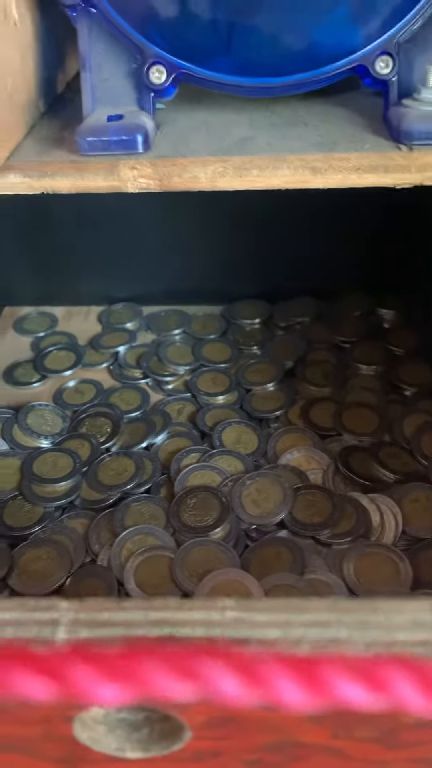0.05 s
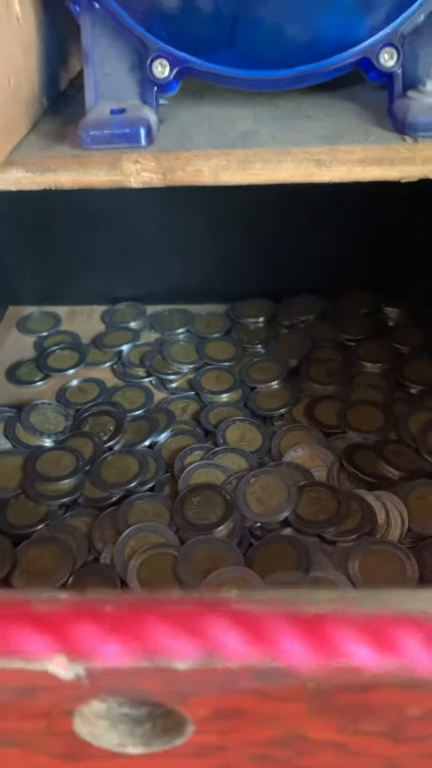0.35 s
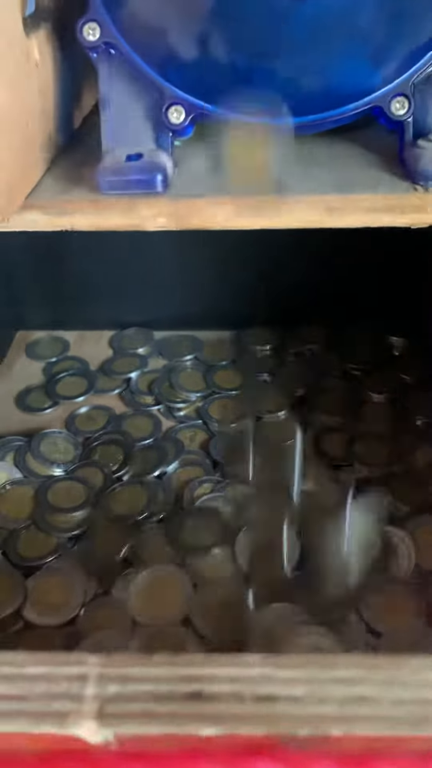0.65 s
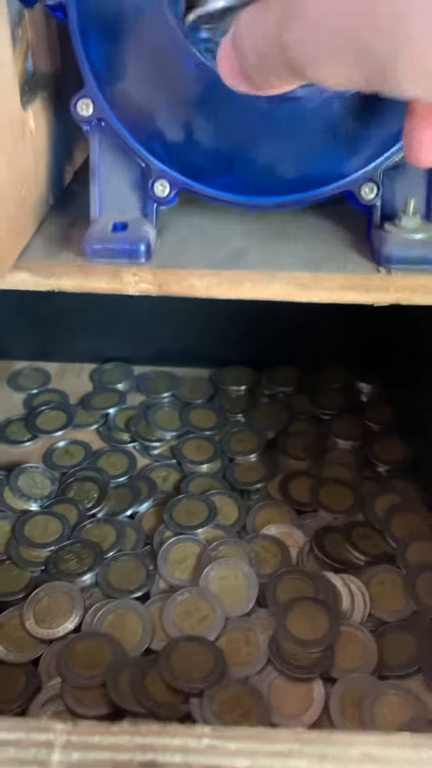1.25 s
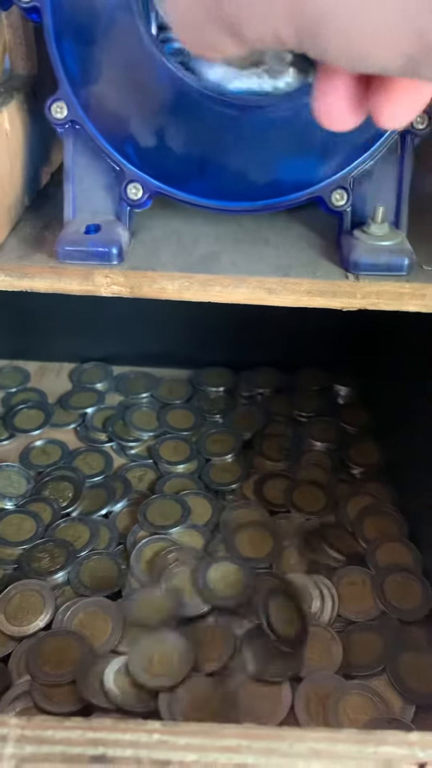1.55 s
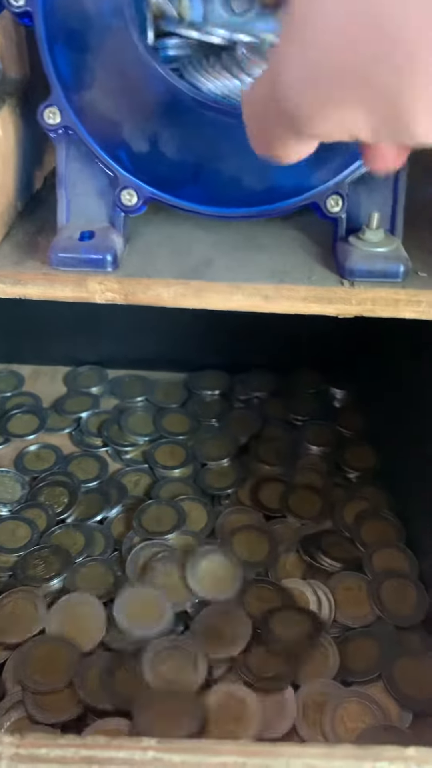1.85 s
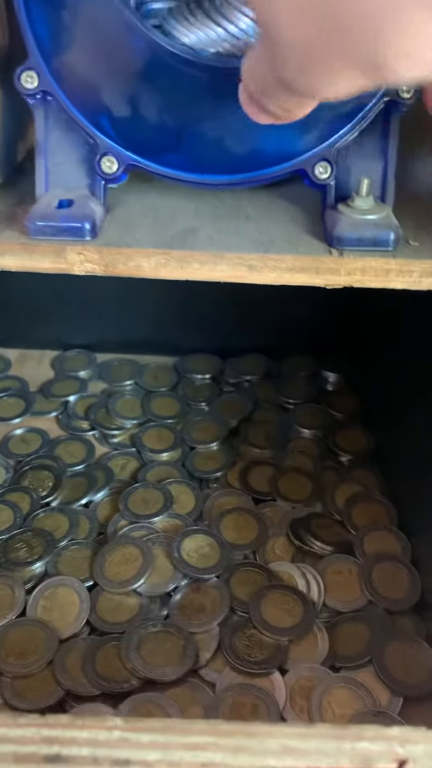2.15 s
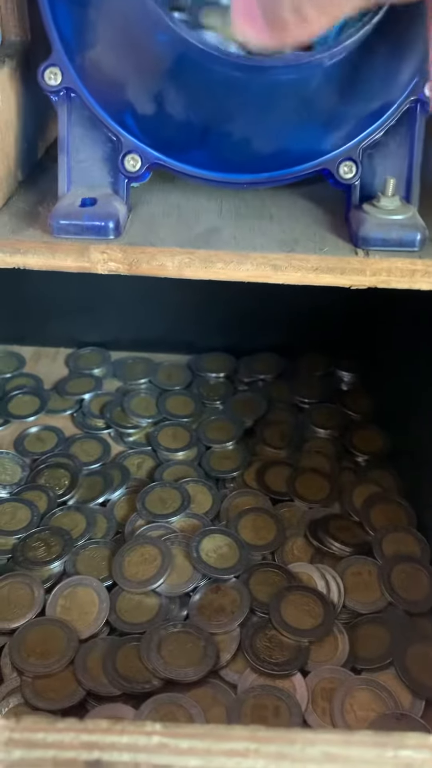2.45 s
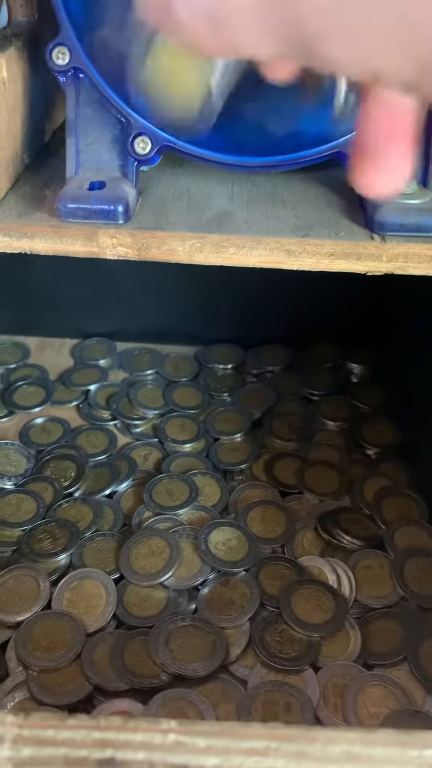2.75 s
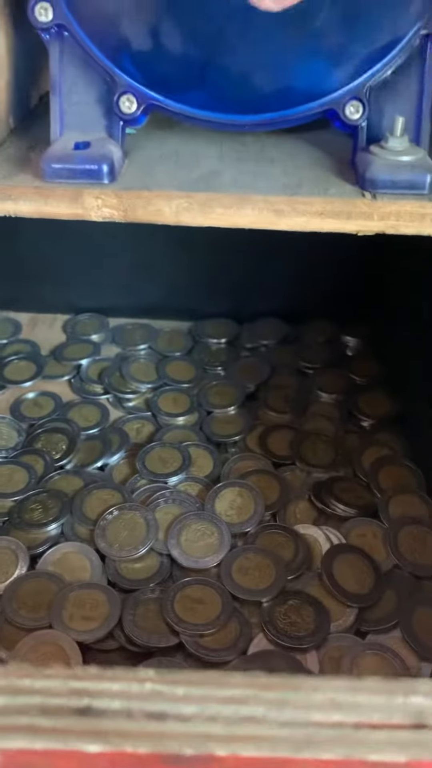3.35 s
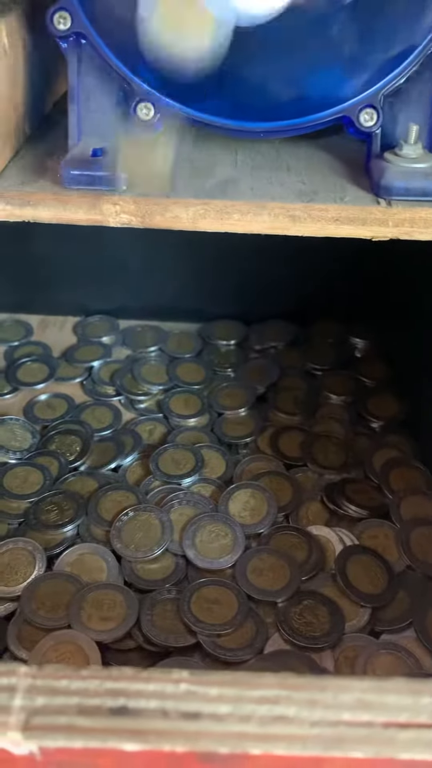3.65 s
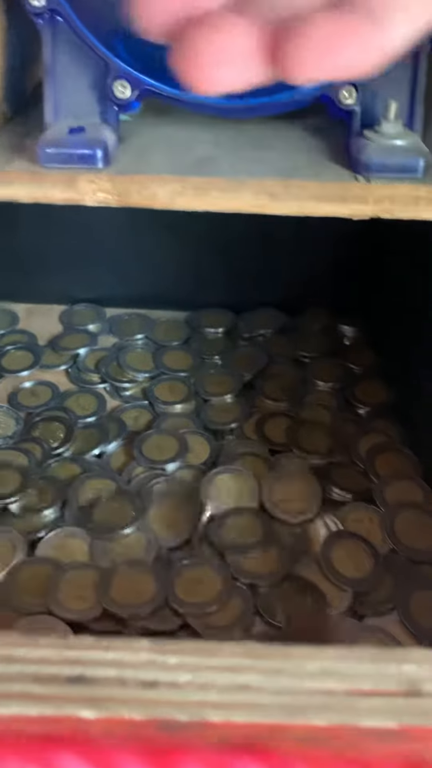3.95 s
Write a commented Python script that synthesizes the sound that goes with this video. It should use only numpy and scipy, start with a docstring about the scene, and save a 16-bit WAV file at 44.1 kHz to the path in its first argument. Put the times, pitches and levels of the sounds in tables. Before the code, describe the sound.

Coins drop onto a heap of coins in five spills, each clinking, thumping the wooden floor and rattling to rest. Between spills, fingers scrape and stir coins in a plastic drum, close by in a wooden cabinet.

```python
"""At a wooden cabinet, a hand pushes coins out of a plastic drum onto a heap of coins, in five spills.
Each landing clinks and thumps the floor board, then the heap rattles and rings as it settles.
A few coins bounce onto bare wood. Between spills, fingers scrape and stir the coins in the drum,
and the hand now and then bumps the cabinet. Cabinet and room echo, and a low hum lies underneath."""
import sys
import numpy as np
from scipy import signal
from scipy.fft import rfft, irfft
from scipy.io import wavfile
from scipy.ndimage import uniform_filter1d

SR = 44100
rng = np.random.default_rng(int(sys.argv[2]) if len(sys.argv) > 2 else 0)


def wrap_up_sound(samples):
    """Save the sound to the file named by the first command line argument, as 16-bit audio."""
    columns = np.atleast_2d(samples).T
    # keep every value between -1 and 1, then stretch to whole-number steps
    tamed = np.clip(columns, -1, 1)
    steps = np.round(tamed * 32767).astype(np.int16)
    wavfile.write(sys.argv[1], SR, steps)


N = 176400  # four seconds

# tone of the room's steady noise: pitch_hz, level_db
AIR_TONE = [(20, -49), (40, -25), (58, 7), (85, 4.5), (115, 7.5), (160, -3.5), (250, -5), (350, -8),
            (600, -24), (1000, -22.5), (2000, -23.5), (5000, -35), (16000, -78)]
# the hand bumping the cabinet: start_s, level_db
HAND_BUMPS = [(.02, -36.5), (1.134, -38.5), (2.127, -45), (3.07, -32.5), (3.10, -37), (3.141, -40),
              (3.299, -33)]
# tone of a bump: pitch_hz, level_db
BUMP_TONE = [(30, -31), (70, 8), (120, 1), (200, -8), (330, -15), (600, -40), (2000, -58)]

# fingers shoving coins in the drum: peak_s, rise_s, fall_s, level_db
FINGER_STROKES = [(.01, 0.033, 0.0084, -19.5), (0.088, 0.028, 0.098, -38.5), (0.306, 0.026, 0.032, -25),
                  (0.367, 0.012, 0.025, -28), (0.451, 0.082, 0.07, -35), (0.842, 0.014, 0.03, -33),
                  (0.95, 0.014, 0.0067, -31), (1.015, 0.059, 0.042, -38), (1.113, .003, .008, -22.5),
                  (1.127, 0.0094, 0.017, -16), (1.205, 0.016, 0.023, -27.5), (1.27, 0.023, 0.03, -26.5),
                  (1.398, 0.0065, 0.043, -37.5), (1.554, 0.048, 0.013, -33), (1.62, 0.013, 0.0091, -37),
                  (1.68, 0.0072, 0.034, -49), (2.191, 0.022, 0.02, -32), (2.223, 0.016, 0.02, -29.5),
                  (2.46, 0.08, 0.03, -42), (2.581, 0.015, 0.039, -26), (2.639, 0.034, 0.028, -23),
                  (3.229, 0.019, 0.017, -28.5), (3.297, 0.012, 0.0071, -18), (3.32, 0.011, 0.017, -32.5),
                  (3.39, 0.098, 0.22, -34), (3.515, 0.03, 0.021, -41), (3.542, 0.031, 0.026, -26.5),
                  (3.627, 0.013, 0.021, -28.5), (3.70, 0.014, 0.071, -36.5), (3.95, 0.022, 0.012, -50)]
# the fingers let go: start_s, end_s
FINGER_PAUSES = [(.51, 0.53), (1.34, 1.374), (2.812, 3.1)]
# single coins tipping over in the drum: start_s, level_db
TIPPING_COINS = [(0.0539, -23.5), (0.1246, -38), (0.1544, -22), (0.288, -18.5), (0.2074, -29),
                 (0.2541, -22.5), (0.4334, -26.5), (0.9207, -24), (1.056, -26.5), (1.1934, -19.5),
                 (1.243, -18), (1.3275, -28), (1.3893, -26.5), (1.475, -29.5), (1.584, -35),
                 (1.6711, -27.5), (1.936, -29.5), (1.983, -21), (2.1098, -23), (2.162, -21),
                 (2.2111, -17.5), (2.276, -31), (2.315, -34.5), (2.356, -24.5), (2.4033, -27),
                 (2.4362, -29), (2.5021, -26), (2.546, -30), (2.6363, -28), (2.691, -19), (2.707, -30.5),
                 (2.731, -28), (2.7728, -30), (3.1222, -25), (3.173, -25), (3.5079, -14.5), (3.6205, -16.5),
                 (3.683, -23)]
# notes of the plastic drum: pitch_hz, level_db, ring_s (always the time to fade by 60 dB)
DRUM_NOTES = [(341, -12, 0.095), (989, -4.5, 0.045), (1607, -9.5, 0.025), (3690, -9, 0.045),
              (3956, -1, 0.02)]
# tone of coins in the drum: pitch_hz, level_db
IN_DRUM_TONE = [(100, -9), (250, -1.5), (380, 0), (590, -9.5), (950, 2), (1250, 1.5), (1700, 3.5),
                (2100, 1), (2800, -3.5), (4000, 0), (5000, 4), (7000, -3.5), (9000, -7), (11000, -3.5),
                (12300, -8), (13600, -9.5), (16000, -15.5)]

# notes of one coin: pitch_hz, level_db (compared with its tick), ring_s
COIN_NOTES = [(1913, -14.5, 0.0095), (3788, -14, 0.014), (6227, -17.5, 0.029), (7277, -8, 0.01),
              (8562, -5.5, 0.023), (9864, -10.5, 0.015), (12400, -4.5, 0.078), (15300, -26, .03)]
# how far each of those notes may stray from coin to coin: share_of_pitch
COIN_DETUNE = [.35, .2, .1, .12, .08, .08, .04, .04]
# notes of bare wood: pitch_hz, level_db, ring_s
BARE_WOOD_NOTES = [(353, -1, 0.12), (1140, 2, 0.046), (1700, 4, 0.011), (2278, -3, 0.042),
                   (2630, -12.5, 0.018), (3620, -10, 0.029)]
# coins knocking on bare wood: start_s, level_db, lowest_note_gain_db
WOOD_KNOCKS = [(1.894, -27, -2.5), (1.953, -20.5, -4), (1.985, -31.5, -36), (3.043, -24.5, -8.5),
               (3.828, -14.5, 5)]
# notes of the floor board under the heap: pitch_hz, level_db, ring_s
BOARD_NOTES = [(338, 6, 0.055), (387.5, 4, 0.049), (470, -11.5, 0.042), (825, -9.5, 0.039),
               (876, -0.5, 0.032), (958, 6, 0.018), (1188, 5, 0.032), (1245, 3, 0.016), (1620, -4.5, 0.047),
               (1800, -4, 0.0067), (2112, -3.5, 0.031), (2560, -6.5, 0.012), (3720, -6, .014)]
# how well the board passes sound to the air: pitch_hz, level_db
FLOOR_BOARD_TONE = [(60, -37.5), (200, -1.5), (270, -5), (330, -5.5), (480, -6), (580, -9), (680, -5.5),
                    (850, -.5), (1250, -2), (1500, -1), (2600, 0), (4000, -7.5), (8000, -30.5)]
# tone of coins on the heap: pitch_hz, level_db
ON_HEAP_TONE = [(200, -45), (900, -6.5), (2000, -3), (3500, -3), (5000, 1), (7000, -2), (9000, -0.5),
                (11000, 5), (12300, 3.5), (13600, -5), (16000, -8.5)]
# the heap settling after each spill: start_s, level_db, fade_db_per_s
HEAP_RATTLES = [(0.618, -26.5, 53), (1.502, -26.5, 112), (1.791, -24.5, 131), (2.904, -23.5, 100),
                (3.798, -24, 89)]
# coins landing on the heap: start_s, length_s, clink_db, clack_db, thump_db
COIN_LANDINGS = [(0.5642, 0.0033, -9, -11.5, -16.5), (0.575, 0.00099, -15, -25, -31),
                 (0.582, 0.0028, -7.5, -24, -16.5), (0.625, 0.005, -21, -23.5, -37),
                 (.634, 0.0044, -13, -17, -20), (0.651, 0.0098, -17, -24, -27),
                 (0.668, 0.017, -22, -33, -36), (0.742, 0.0017, -16.5, -21, -26),
                 (1.494, 0.0031, -10.5, -17, -17.5), (1.504, 0.0081, -16.5, -25, -32),
                 (1.778, 0.0014, -11, -16, -20), (1.807, 0.0042, -16.5, -22.5, -27),
                 (2.883, 0.0092, -15.5, -18, -27), (2.895, 0.0027, -14.5, -17.5, -23),
                 (2.901, 0.0092, -12, -21.5, -21), (2.931, 0.0089, -22.5, -33, -34.5),
                 (2.957, .001, -18, -30, -36), (3.741, 0.0047, -11, -19, -23),
                 (3.7834, 0.0025, -10.5, -18.5, -19.5), (3.82, 0.015, -15, -15, -21.5),
                 (3.859, 0.0021, -26, -24, -31), (3.867, 0.0072, -15.5, -29, -33)]

# strength of the cabinet's and the room's echoes: pitch_hz, level_db
CABINET_ECHO_TONE = [(200, -30), (400, -1.5), (650, 7), (1000, -7), (2500, 1), (4000, -1), (5200, -9.5),
                     (8000, -12.5), (12000, -25), (16000, -19)]
ROOM_ECHO_TONE = [(150, -11.5), (400, -23), (650, -13), (1000, -12), (2000, -11.5), (5000, -14),
                  (12000, -17.5)]
# how long those echoes last: pitch_hz, ring_s
CABINET_ECHO_TIMES = [(200, 0.05), (2000, 0.02), (12000, 0.021)]
ROOM_ECHO_TIMES = [(150, 0.63), (400, 0.4), (1000, 1), (3000, 0.2), (12000, 0.26)]
# how alike the echoes are at the left and right microphones: pitch_hz, likeness_0_to_1
ECHO_LIKENESS = [(150, .99), (400, .9), (650, .3), (1000, .6), (2000, 0), (4000, 0), (5200, .7), (6500, .4),
                 (8300, .9), (10500, .4), (12000, .97), (13300, .97), (15000, .7)]
# how far the wave on the left runs ahead of the right: pitch_hz, lead_radians
LEFT_LEAD = [(100, -.1), (330, -.15), (900, .4), (2000, .9), (3800, 1.1), (5200, 3.14), (6500, 5.1),
             (7700, 6.1), (9000, 6.4), (10500, 8.0), (11800, 9.2), (13400, 9.6), (14800, 12.2),
             (16000, 12.6)]
# how much louder the left side is: pitch_hz, left_minus_right_db
LEFT_BALANCE = [(50, -1), (300, -5.5), (500, -3.5), (750, -2.5), (1200, 2.5), (2000, -1.5), (4000, 1),
                (8000, 0)]

FLURRY_FADE_S = 0.0053
WOOD_DETUNE, WOOD_SPREAD_DB = .04, 3  # how much pitch (as a share) and level vary between blows


def amp(db):
    """Turns decibels into a number to multiply by."""
    return 10 ** (np.asarray(db) / 20)


def unit(x):
    """Scales a sound to an average (rms) level of one."""
    return x / np.sqrt(np.mean(x ** 2) + 1e-20)


def with_energy(x, seconds):
    """Gives a sound as much energy as a level of one held for that many seconds."""
    return x * np.sqrt(seconds * SR / (np.sum(x ** 2) + 1e-20))


def look_up(points, hz):
    """Reads between the rows of a table, along a musical (logarithmic) pitch scale."""
    pitches, values = np.transpose(points)
    return np.interp(np.log(hz + 1), np.log(pitches + 1), values)


def add(mix, start_s, sound):
    """Adds a sound to the mix at the given time."""
    part = mix[max(round(start_s * SR), 0):][:len(sound)]
    part += sound[:len(part)]


def colour(x, tone, size=4096):
    """Filters a sound to follow a tone table, with nothing heard before the sound starts."""
    log_gain = np.log(amp(look_up(tone, abs(np.fft.fftfreq(size, 1 / SR)))))
    taps = np.fft.ifft(np.exp(np.conj(signal.hilbert(log_gain)))).real[:size // 2]
    return signal.fftconvolve(x, taps)[:len(x)]


def ring(hz, ring_s, size=8000):
    """One fading note of a struck object."""
    t = np.arange(size) / SR
    return np.sin(2 * np.pi * hz * t) * np.exp(-np.log(1000) * t / ring_s)


def contacts(per_s, spread_db, size):
    """Coins touch at random, making many small clicks and a few large ones."""
    strength = amp(spread_db * np.minimum(rng.exponential(1, size), 4))
    return strength * rng.choice([-1, 1], size) * (rng.random(size) < per_s / SR)


def flurry(length_s, per_s, size=11025, rise_share=0.26, first_hit_db=8):
    """One firm hit, then a rush of clicks that builds, holds and dies away."""
    t = np.arange(size) / SR
    rise = np.minimum(t / (rise_share * length_s + 1 / SR), 1)
    clicks = contacts(per_s, spread_db=4, size=size) * rise
    clicks[0] = amp(first_hit_db)
    return clicks * np.exp(-np.maximum(t - length_s, 0) / FLURRY_FADE_S)


def background(air_db=-43.5, width_db=-11.5, hum_hz=119, hum_db=-43.5, waver_depth=0.29):
    """Low room noise and a hum whose loudness wavers."""
    hz, t = np.fft.rfftfreq(N, 1 / SR), np.arange(N) / SR
    middle, side = unit(irfft(rfft(rng.standard_normal((2, N))) * amp(look_up(AIR_TONE, hz)), N))
    air = middle + amp(width_db) * np.array([side, -side])
    waver_rates_hz = rng.uniform(-5.5, 11.0, 20)
    waver = unit(sum(np.cos(2 * np.pi * (rate * t + rng.random())) for rate in waver_rates_hz))
    hum = unit((1 + waver_depth * waver) * np.sin(2 * np.pi * hum_hz * t))
    return amp(air_db) * air + amp(hum_db) * hum


def hand_bumps(fade_s=0.062):
    """The hand nudges the cabinet, which gives a short, dull thud."""
    out, t = np.zeros(N), np.arange(SR // 4) / SR
    for start_s, db in HAND_BUMPS:
        thud = colour(rng.standard_normal(len(t)) * np.exp(-t / fade_s), BUMP_TONE)
        add(out, start_s, amp(db) * with_energy(thud, fade_s))
    return out


def coins(clicks, count=5, size=8000, tick_s=.0007, chatter_s=.009):
    """Each click strikes one of several coins, which ticks and rings with its own notes."""
    t, out = np.arange(size) / SR, 0
    # each coin chatters for a moment before another takes its turn
    turn = np.arange(len(clicks)) / (chatter_s * SR) + 2 * rng.random(len(clicks))
    struck_coin = rng.integers(0, count, len(clicks))[turn.astype(int)]
    for k in range(count):
        coin = with_energy(rng.standard_normal(size) * np.exp(-t / tick_s), 1 / SR)
        for (hz, db, ring_s), detune in zip(COIN_NOTES, COIN_DETUNE):
            note = ring(hz * (1 + detune * rng.uniform(-1, 1)), ring_s)
            coin += amp(db) * with_energy(note, 1 / SR) * rng.choice([-1, 1])
        out += signal.oaconvolve(clicks * (struck_coin == k), coin)[:len(clicks)]
    return out


def coins_in_drum(stir_db=-50.5, pause_db=-14, shell_db=-8.5, tip_s=0.0053, tip_db=-8.5, bright_db=-8.5):
    """Coins grind together under the fingers, the drum rings along, and single coins tip over."""
    t = np.arange(N) / SR
    strokes = (amp(db) * np.exp(-np.maximum((peak_s - t) / rise_s, (t - peak_s) / fall_s))
               for peak_s, rise_s, fall_s, db in FINGER_STROKES)
    push = np.sqrt(sum(stroke ** 2 for stroke in strokes))
    scrape = push * unit(contacts(per_s=2200, spread_db=3.5, size=N))
    stir = amp(stir_db) * unit(contacts(per_s=180, spread_db=4.5, size=N))
    paused = sum((t > start_s) & (t < end_s) for start_s, end_s in FINGER_PAUSES)
    clicks = (scrape + stir) * amp(pause_db * uniform_filter1d(paused.astype(float), size=400))
    shell = sum(amp(db) * unit(signal.oaconvolve(clicks, ring(hz, ring_s))[:N])
                for hz, db, ring_s in DRUM_NOTES)
    grinding = unit(colour(coins(clicks, count=24), IN_DRUM_TONE))
    out = (grinding + amp(shell_db) * shell) * np.sqrt(np.mean(clicks ** 2))
    for start_s, db in TIPPING_COINS:
        metal = coins(flurry(tip_s, per_s=900), count=2)
        clink = unit(colour(metal, IN_DRUM_TONE)) + amp(bright_db) * unit(colour(metal, ON_HEAP_TONE))
        add(out, start_s, amp(db + tip_db) * with_energy(clink, tip_s + FLURRY_FADE_S))
    return out


def wood_knocks():
    """A bouncing coin reaches bare wood, which rings more clearly than the board under the heap."""
    out = np.zeros(N)
    for start_s, knock_db, lowest_db in WOOD_KNOCKS:
        knock = 0
        for k, (hz, db, ring_s) in enumerate(BARE_WOOD_NOTES):
            note_db = db + lowest_db * (k == 0) + WOOD_SPREAD_DB * rng.uniform(-1, 1)
            note_hz = hz * (1 + WOOD_DETUNE * rng.uniform(-1, 1) / 2)
            knock += (-1) ** k * amp(note_db) * ring(note_hz, ring_s)
        add(out, start_s, amp(knock_db) * with_energy(knock, 0.0053))
    return out


def board_ring(clicks, notes):
    """The board under the heap rings; its notes shift a little with the spot that is struck."""
    out = 0
    for hz, db, ring_s in notes:
        pitch_shift, level_shift = rng.uniform(-1, 1, 2)
        note = signal.oaconvolve(clicks, ring(hz * (1 + WOOD_DETUNE * pitch_shift), ring_s))
        out += amp(db + WOOD_SPREAD_DB * level_shift) * unit(note[:len(clicks)]) * rng.choice([-1, 1])
    return colour(out, FLOOR_BOARD_TONE)


def board_thump(pitch_hz=380.3, length_s=.011):
    """The board gives under the blow and swings a few times before its load stops it."""
    t = np.arange(0, length_s, 1 / SR)
    hz = pitch_hz * (1 + WOOD_DETUNE * rng.uniform(-1.2, 1))
    return np.hanning(len(t)) * np.sin(2 * np.pi * hz * t)


def heap_settling(rise_s=0.0031, board_db=-6):
    """Coins slide and rattle on the heap, ever more faintly."""
    t = np.arange(N) / SR
    level = sum(np.clip((t - start_s) / rise_s, 0, 1) * amp(db - fade * np.maximum(t - start_s, 0))
                for start_s, db, fade in HEAP_RATTLES)
    clicks = contacts(per_s=830, spread_db=1, size=N) * level
    metal = unit(colour(coins(clicks, count=24), ON_HEAP_TONE))
    wood = amp(board_db) * unit(board_ring(clicks, BOARD_NOTES))
    return (metal + wood) * np.sqrt(np.mean(level ** 2))


def coin_landings(split_hz=600, board_lag_s=.0015, low_ring_db=-8.5, boom_lag_s=0.014, boom_db=-4.5):
    """Falling coins strike the heap, and the blow passes into the board and the hollow cabinet."""
    out = np.zeros(N)
    low_notes = [note for note in BOARD_NOTES if note[0] < split_hz]
    high_notes = [note for note in BOARD_NOTES if note[0] >= split_hz]
    boom = ring(hz=107, ring_s=0.12)
    for start_s, length_s, clink_db, clack_db, thump_db in COIN_LANDINGS:
        clicks = flurry(length_s, per_s=2500)
        # the small times added to length_s allow for the energy in each sound's tail
        clink = with_energy(colour(coins(clicks), ON_HEAP_TONE), length_s + 0.0013)
        clack = with_energy(board_ring(clicks, high_notes), length_s + 0.0024)
        thump = with_energy(board_thump(), 0.0029)
        low_ring = with_energy(board_ring(clicks, low_notes), length_s + 0.0041)
        add(out, start_s, amp(clink_db) * clink)
        add(out, start_s + board_lag_s / 2, amp(clack_db) * clack)
        add(out, start_s, amp(thump_db) * thump)
        add(out, start_s + board_lag_s, amp(thump_db + low_ring_db) * low_ring)
        add(out, start_s + boom_lag_s, amp(thump_db + boom_db) * boom)
    return out


def echoes(x, tone, ring_times, delay_s, size=256):
    """Sound bounces off walls: two unrelated washes of echoes, each pitch fading at its own speed."""
    hz, t, bands = signal.stft(rng.standard_normal((2, SR)), SR, nperseg=size)
    fade_rate = np.log(1000) / look_up(ring_times, hz)[:, None]
    bands = bands * np.exp(-fade_rate * t) * np.sqrt(2 * fade_rate / SR)
    bands *= amp(look_up(tone, hz))[:, None]
    tail = signal.istft(bands, SR, nperseg=size)[1]
    delayed_tail = np.pad(tail, ((0, 0), (round(delay_s * SR), 0)))
    return signal.fftconvolve(x[None], delayed_tail, axes=1)[:, :N]


def scene():
    """The sounds reach two microphones directly, off the cabinet walls and through the room."""
    direct = coin_landings() + heap_settling() + wood_knocks() + coins_in_drum() + hand_bumps()
    cabinet = echoes(direct, CABINET_ECHO_TONE, CABINET_ECHO_TIMES, delay_s=0.000999)
    room = echoes(direct, ROOM_ECHO_TONE, ROOM_ECHO_TIMES, delay_s=0.011)
    left_echo, other_echo = cabinet + room
    hz = np.fft.rfftfreq(N, 1 / SR)
    likeness = np.clip(look_up(ECHO_LIKENESS, hz), 0, 1)
    right_echo_spectrum = likeness * rfft(left_echo) + np.sqrt(1 - likeness ** 2) * rfft(other_echo)
    right_lag = np.exp(-1j * look_up(LEFT_LEAD, hz))
    right = irfft((rfft(direct) + right_echo_spectrum) * right_lag, N)
    return np.array([direct + left_echo, right]) + background()


def record(dry, ceiling=1.2, cutoff_hz=16000):
    """Gives each side its own tone, gently squashes loud peaks and cuts the highest treble."""
    balance_db = look_up(LEFT_BALANCE, np.fft.rfftfreq(N, 1 / SR))
    uneven = irfft(rfft(dry) * amp(np.array([balance_db, -balance_db]) / 2), N)
    squashed = ceiling * np.tanh(uneven / ceiling)
    treble_cut = signal.firwin(511, cutoff_hz, window=("kaiser", 9), fs=SR)
    return signal.oaconvolve(squashed, treble_cut[None], "same")


dry = scene()
out = record(dry)
wrap_up_sound(out)
```